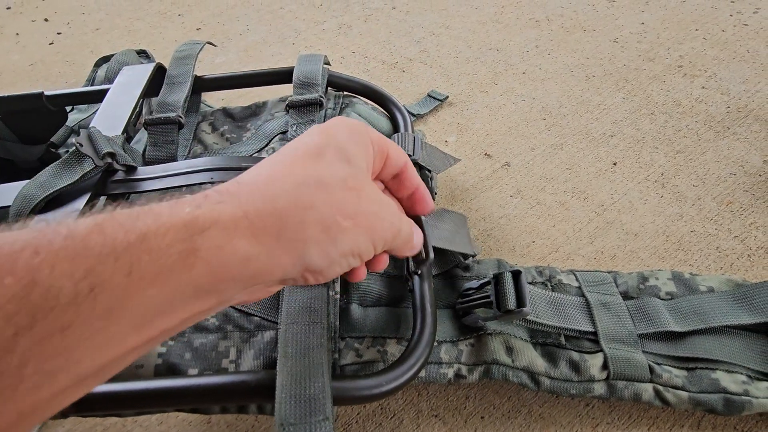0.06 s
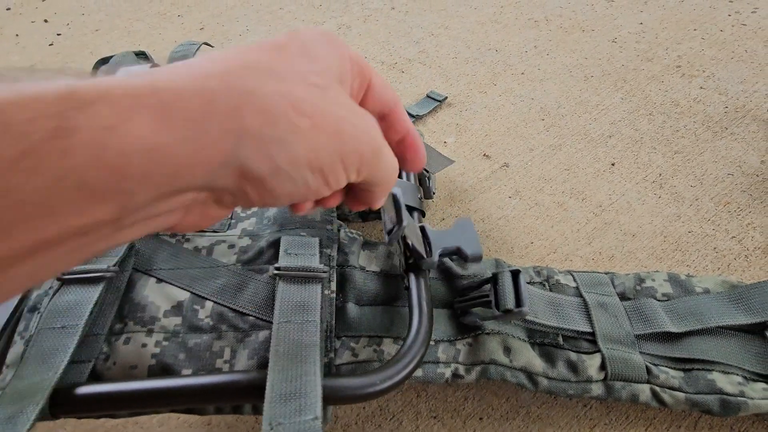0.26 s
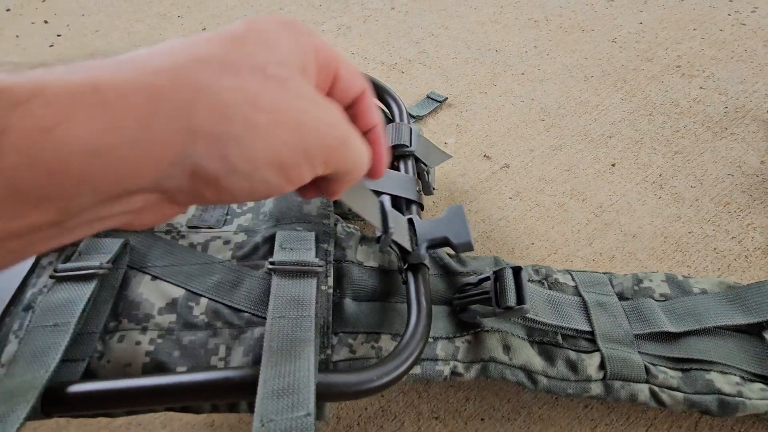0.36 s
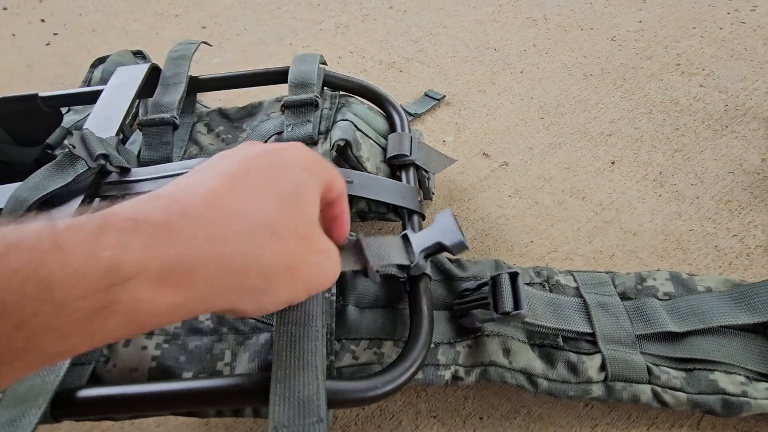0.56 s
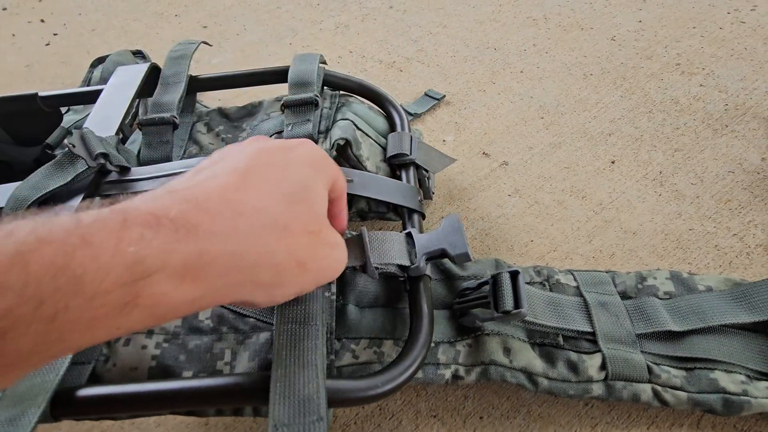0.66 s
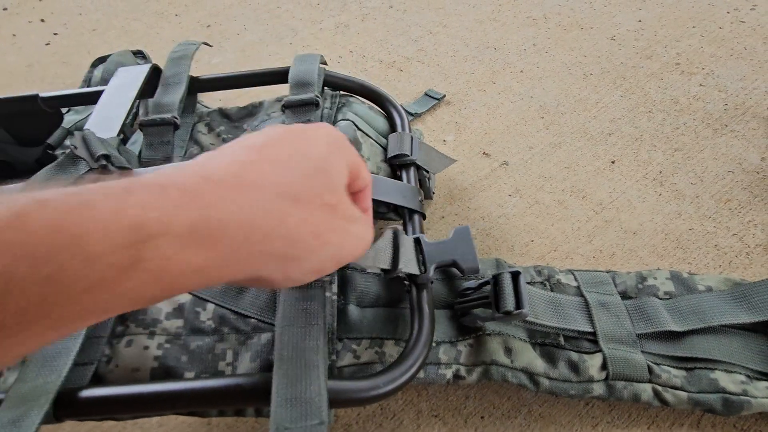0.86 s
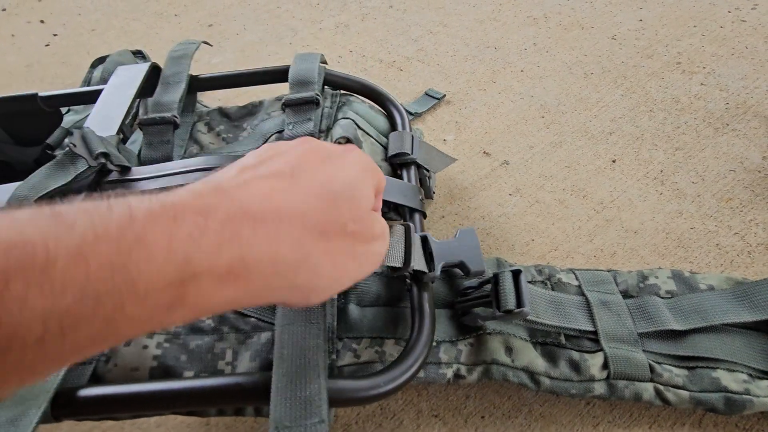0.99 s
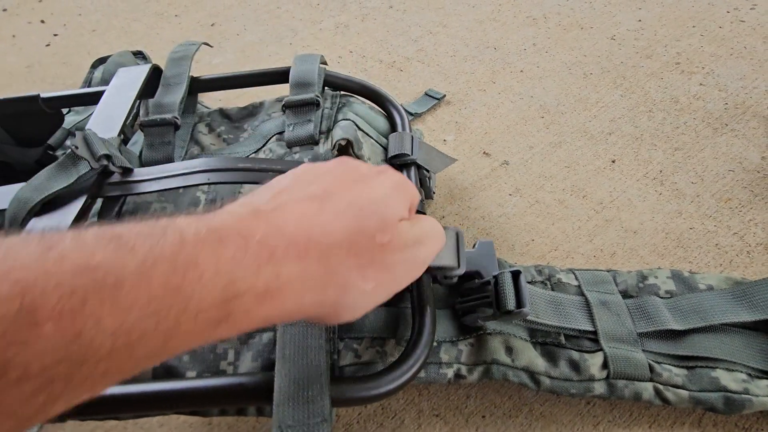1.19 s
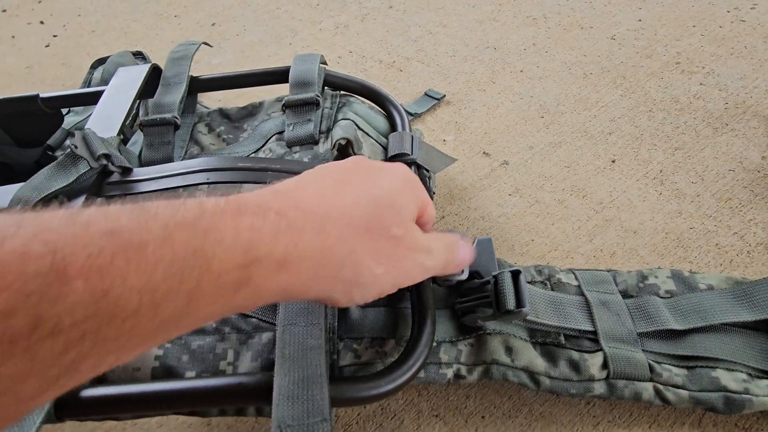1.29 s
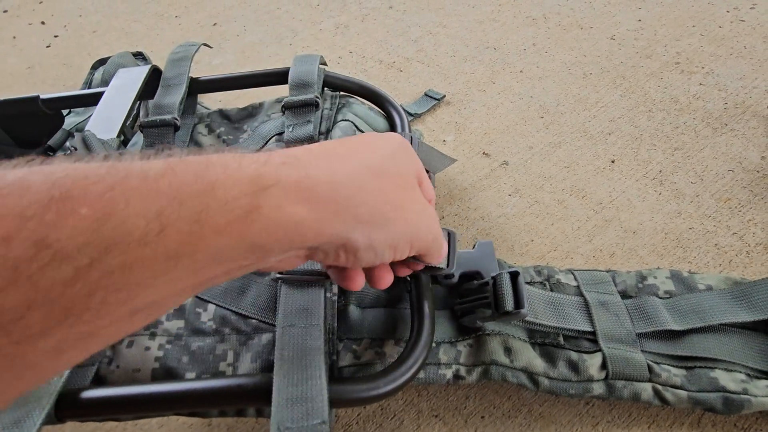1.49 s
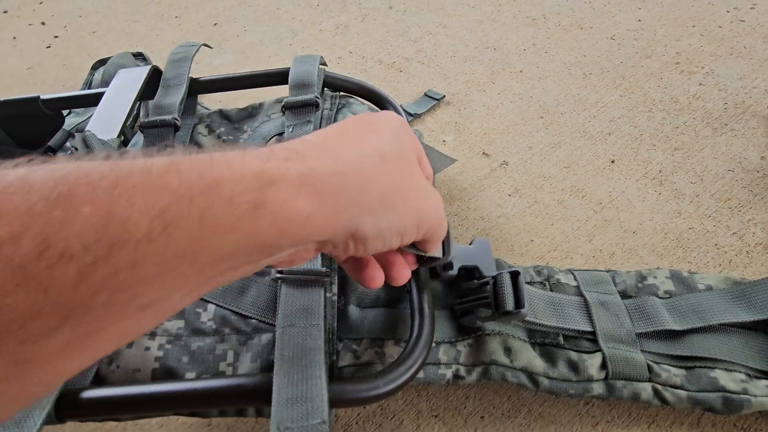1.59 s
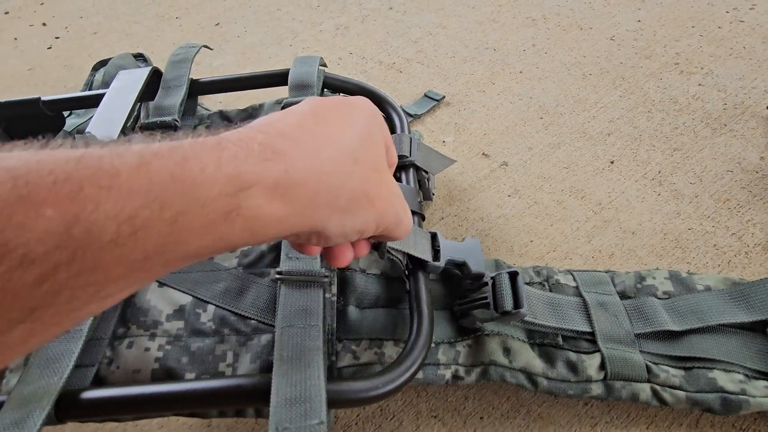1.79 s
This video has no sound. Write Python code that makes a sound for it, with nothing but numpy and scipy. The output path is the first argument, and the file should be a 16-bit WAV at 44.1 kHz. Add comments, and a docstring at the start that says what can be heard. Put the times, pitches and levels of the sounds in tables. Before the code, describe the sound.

A plastic buckle clicks and rattles as a webbing strap slides through it.

```python
"""A quiet room, a stereo microphone close to a rucksack. A hand flips a webbing strap over the metal
tube frame: the plastic buckle rattles and knocks the tube once, and the pack thuds under the hand.
Then the webbing slides through the buckle in short, grainy strokes, among soft bumps on the pack
and scattered clicks. Midway the buckle's loose half ticks against its mate; a cluster of clicks
comes last. Ventilation rumble, a low hum and a faint hiss lie under it all."""
import sys
import numpy as np
from scipy import signal
from scipy.fft import rfft, irfft
from scipy.io import wavfile

SR = 44100
rng = np.random.default_rng(int(sys.argv[2]) if len(sys.argv) > 2 else 0)


def bounce(signal):
    """Save signal as a 16-bit WAV file at the path given by the first command-line argument."""
    frames = np.transpose(np.atleast_2d(signal))
    limited = np.clip(frames, -1, 1)
    pcm = np.round(limited * 32767).astype(np.int16)
    wavfile.write(sys.argv[1], SR, pcm)


N = 81585
SIDE = np.array([[1], [-1]])  # adds to the left channel, subtracts from the right


def buckle():
    """Each contact cracks, knocks the buckle's body and rings the modes its contact point favours."""
    # contacts: start_s, ring_db, crack_db, knock_db, bright_hz, t60_factor, pan_db
    contacts = [(.028, -44.5, -47, -68, 3600, 0.49, 1), (.104, -47.5, -58, -49.5, 3270, 0.39, 0),
                (.2108, -26.5, -27.5, -52, 2950, 1.2, 3), (.2125, -29.5, -27, -36.5, 3050, 0.87, -13),
                (.219, -33.5, -41, -40.5, 2920, 1.6, 10.5), (.229, -33, -39, -49, 2680, 0.87, -3),
                (.250, -41, -40, -59, 5000, 0.76, -9), (.2706, -33, -24, -53, 3000, 0.54, 3),
                (.272, -49, -23.5, -34, 6000, 0.4, 0), (.285, -21.5, -18, -47, 7700, 0.65, -2.5),
                (.2875, -21.5, -18.5, -41, 4000, .9, -5), (.291, -28, -21.5, -56, 7600, 0.28, -9),
                (0.2936, -19, -33, -40.5, 5300, 1, -2), (0.297, -30.5, -22, -40, 3500, 0.85, 2),
                (.353, -29.5, -34.5, -45.5, 3830, 0.59, -1.5), (.355, -34, -35.5, -69, 4230, 0.28, -14),
                (.560, -43.5, -52, -44, 2800, 0.29, 0), (.6885, -50, -62, -77, 5600, 0.56, -8),
                (0.7514, -57, -56, -72, 6000, 0.54, -9), (.795, -50, -70, -64, 2200, 0.84, -11),
                (.806, -41.5, -51, -62, 2500, 0.27, -6.5), (.889, -36, -54, -54, 3900, 0.82, -5.5),
                (1.1046, -42, -41, -64, 6800, .3, -4), (1.11, -49, -45, -72, 7400, 0.23, -15),
                (1.125, -30.5, -31.5, -64, 5560, 0.42, -2.5), (1.127, -36, -54, -32, 2440, 0.6, -5.5),
                (1.735, -45, -61, -49.5, 2220, 1.1, 1.5), (1.805, -63, -39, -59, 7500, 0.47, -4),
                (1.8128, -31.5, -40.5, -66, 3870, 1.2, 6.5), (1.8155, -39.5, -39, -56, 3430, .8, 1),
                (1.819, -36, -45, -45, 3020, 1.2, -5.5), (1.829, -34, -54, -70, 3300, 0.66, 0)]
    # ringing modes of the plastic: pitch_hz, level_db, t60_s
    buckle_modes = [(1204, -5, 0.055), (1690, -15.5, 0.11), (2198, -1, 0.051), (2482, -6, 0.041),
                    (2973, -3.5, 0.077), (3350, -9, 0.066), (3708, -5.5, 0.039), (4260, -14, 0.056),
                    (5010, -6, .045), (5560, -0.5, .05), (6400, -14, 0.072), (7540, -7.5, 0.035),
                    (7880, -4.5, 0.04)]
    # lower modes of the buckle's body: pitch_hz, level_db, t60_s
    knock_modes = [(611, -8.5, 0.049), (740, 0.5, 0.043), (1068, -3, 0.01), (1207, -23, 0.067),
                   (1405, -5, 0.037)]
    # spectrum of the crack: frequency_hz, level_db
    crack_spectrum = [(300, -27), (900, -5), (1800, -3.5), (2600, 6), (5000, -3.5), (8200, 2.5),
                      (9800, -22), (11200, 1.5), (13000, -5.5), (15500, -4.5)]
    grip_detune, scatter_db = 0.0048, 1.5  # fingers shift and reweight the modes on each contact
    port_spread_rad = 0.5  # a turning buckle radiates unevenly towards the two microphone ports
    contact_octaves = 0.5  # width of the favoured band
    out, crack_decay = np.zeros((2, N)), fade(t60=0.015)
    crack_noise = wide_noise(crack_spectrum, side_db=-7.5)
    for start_s, ring_db, crack_db, knock_db, bright_hz, t60_factor, pan_db in contacts:
        scatters, shifts, leads = rng.standard_normal((3, len(buckle_modes)))
        modes = []
        for (hz, db, t60), scatter, shift in zip(buckle_modes, scatters, shifts):
            off_band_db = 10 * np.log10(1 + (2 * np.log2(hz / bright_hz) / contact_octaves) ** 2)
            modes.append((hz * (1 + grip_detune * shift), db + scatter_db * scatter - off_band_db, t60))
        ringing = undb(ring_db) * ring(modes, t60_factor, port_spread_rad * leads)
        knock = undb(knock_db) * ring(knock_modes, t60_factor)
        crack = undb(crack_db) * np.roll(crack_noise, rng.integers(N), axis=1) * crack_decay
        add(out, start_s, pan(pan_db) * (ringing + knock))
        add(out, start_s, pan(pan_db) * crack)
    # the small buckle gives off little bass
    return signal.sosfilt(signal.butter(3, 490, "high", fs=SR, output="sos"), out)


def frame_tube():
    """The buckle strikes the metal tube once, and it rings high and short."""
    # blow on the tube: start_s, level_db
    hits = [(.2705, -14)]
    # tube modes: pitch_hz, level_db, t60_s
    modes = [(2430, -1, 0.089), (2760, 5, 0.008), (3510, -3, 0.02), (5540, -15, 0.035),
             (7470, -10.5, 0.032), (8470, -10.5, 0.023), (10810, -13.5, 0.038), (11800, -22.5, 0.017),
             (13330, -8, 0.015)]
    return strike(hits, modes)


def loose_half():
    """The buckle's loose half ticks against its mate and rings with its own modes."""
    # ticks: start_s, level_db
    ticks = [(.8888, -40.5), (.8935, -43)]
    # modes of the loose half: pitch_hz, level_db, t60_s
    modes = [(1222, -11.5, 0.077), (1724, -12, 0.071), (2566, -2, 0.03), (3110, -2.5, .06),
             (3380, 1, 0.0366), (4120, -5, 0.021), (4667, -24, 0.072), (5360, -3.5, 0.016),
             (6420, -2.5, 0.024)]
    return strike(ticks, modes)


def webbing():
    """Each stroke of the strap swells and dies; threads catching on the buckle make it grainy."""
    # strokes: middle_s, length_s, cloth_db, scrape_db, hiss_db
    strokes = [(0.09, 0.75, -68.5, -66.5, -67.5), (0.214, .04, -64, -74, -59),
               (0.236, 0.053, -50.5, -46, -48), (0.371, 0.11, -61, -56, -52.5),
               (0.52, 0.069, -54.5, -56, -56), (0.619, 0.049, -64.5, -53.5, -56),
               (.683, 0.028, -78, -63, -51.5), (0.756, 0.016, -84, -68, -60),
               (0.801, .035, -64, -60.5, -71), (0.923, 0.084, -77.5, -61.5, -64),
               (1.094, 0.08, -74, -67, -60.5), (1.234, 0.038, -60.5, -79, -68),
               (1.306, .04, -78, -67, -60.5), (1.403, 0.042, -71.5, -66, -64.5),
               (1.468, 0.048, -72.5, -71, -58.5), (1.598, 0.031, -82, -60.5, -49),
               (1.693, 0.072, -70, -69, -60.5), (1.731, 0.026, -77, -77, -60.5),
               (1.80, 0.055, -58, -64, -59), (1.845, 0.06, -67, -57.5, -73)]
    # spectra of cloth rustle, weave scrape and sliding hiss: frequency_hz, level_db
    cloth_spectrum = [(150, -1.5), (400, -6.5), (700, 2.5), (1300, -3.5), (2000, -4.5), (4000, -7.5),
                      (15000, -49)]
    scrape_spectrum = [(400, -25.5), (1500, -3), (2600, -1.5), (4000, 4), (5500, 1), (8000, -1.5),
                       (10000, -14.5), (15000, -21)]
    hiss_spectrum = [(2000, -31.5), (5500, -9), (8000, -6), (9700, -16.5), (11000, -11.5), (12500, -3.5),
                     (15500, -11)]
    catches_per_s, catch_spread_db, grain_share = 780, 2, 0.39
    t, out = clock(), np.zeros((2, N))
    caught = rng.random(N) < catches_per_s / SR
    catches = caught * undb(catch_spread_db * np.minimum(rng.exponential(size=N), 4))
    roughness = unit(signal.fftconvolve(catches, fade(t60=0.00817))[:N])
    grain = unit(1 - grain_share + grain_share * roughness)
    cloth = noise(cloth_spectrum) + .5 * noise(cloth_spectrum, channels=2)
    scrape = noise(scrape_spectrum, channels=2) * pan(db=-2.5)
    hiss = noise(hiss_spectrum, channels=2) * pan(db=-5)
    for middle_s, length_s, cloth_db, scrape_db, hiss_db in strokes:
        swell = np.exp(-(2 * (t - middle_s) / length_s) ** 2)
        out += swell * (undb(cloth_db) * cloth + undb(scrape_db) * scrape + undb(hiss_db) * hiss)
    return out * grain


def pack():
    """The pack gives soft, dead bumps and low thuds under the hand."""
    # bumps and thuds: start_s, level_db
    bumps = [(.5241, -37), (.5905, -42.5), (.6145, -48), (1.2038, -45.5), (1.233, -51)]
    thuds = [(.214, -41), (.281, -49), (.797, -50.5)]
    # their damped modes: pitch_hz, level_db, t60_s
    bump_modes = [(568, 5, .014), (800, -1, 0.025), (1346, -1.5, 0.0084), (3430, -1, .003),
                  (7200, -9, .002)]
    thud_modes = [(166, -8, 0.091), (281, 0, 0.12), (437, -4.5, 0.076)]
    return strike(bumps, bump_modes) + strike(thuds, thud_modes)


def microphone_ports(sound):
    """Close sound reaches the two ports with a phase and level gap that varies with frequency."""
    # left port against right: frequency_hz, lead_rad, level_db
    gaps = [(200, 0, 5.5), (835, 1.3, 3), (1390, 2.3, 8), (2104, 2.34, 2.5), (2500, 0.5, -1.5),
            (3030, 2.16, 4), (5460, 0.5, 1.5), (7750, 1.37, 0), (11900, 2, -3)]
    response = np.exp(1j * SIDE / 2 * along_hz(gaps)) * undb(SIDE / 2 * along_hz(gaps, column=2))
    impulse = np.roll(irfft(response, N), 128, axis=1)[:, :257]  # short and centred on time zero
    return signal.fftconvolve(sound, impulse, mode="same", axes=1)


def room_echoes(sound, t60, delay_s):
    """Dense reflections of even colour, different in each channel."""
    spectrum = rfft(rng.standard_normal((2, N)) * fade(t60))
    whitened = irfft(spectrum / (np.abs(spectrum) + 1e-12), N)
    tail = whitened * fade(t60) ** .2  # a gentle extra fade keeps the late tail quiet
    response = np.zeros((2, N))
    add(response, delay_s, unit(tail) / np.sqrt(N))
    return signal.fftconvolve(sound, response, axes=1)[:, :N]


def room_tone():
    """Low ventilation rumble, a wavering hum of narrow noise bands and a faint hiss."""
    # spectra of rumble and hiss: frequency_hz, level_db
    rumble_spectrum = [(20, -0.5), (45, 4), (70, 1.5), (120, 0.5), (180, -6), (270, -3.5), (340, -17),
                       (450, -23), (900, -23), (2000, -75)]
    hiss_spectrum = [(100, -6), (350, 0.5), (700, -5.5), (2000, -1), (5000, -5.5), (6400, -3), (7500, 9.5),
                     (8700, -9), (10000, -9.5), (12500, -11.5), (15500, -16)]
    # hum bands: pitch_hz, level_db
    hum_bands = [(68, -63.5), (231, -67)]
    rumble = undb(-58) * wide_noise(rumble_spectrum, side_db=-17)
    hum = 0
    for hz, db in hum_bands:
        band = [(hz * .88, -70), (hz * .97, -2), (hz, 0), (hz * 1.03, -2), (hz * 1.12, -70)]
        hum += undb(db) * noise(band)
    hiss = undb(-65.5) * wide_noise(hiss_spectrum, side_db=1)
    return (rumble + hum) * pan(db=1.85) + hiss * pan(db=-4)


def strike(hits, modes):
    """One object struck at the given times."""
    out = np.zeros((2, N))
    for start_s, db in hits:
        add(out, start_s, undb(db) * ring(modes))
    return out


def ring(modes, t60_factor=1, lead_rad=np.zeros(20)):
    """Decaying modes set off by one blow; each may lead in one channel."""
    t, out = np.arange(8000) / SR, 0
    for k, (hz, db, t60) in enumerate(modes):
        tone = np.sin(2 * np.pi * hz * t + np.pi * k / 2 + SIDE * lead_rad[k])
        decay = np.exp(-np.log(1000) * t / max(t60 * t60_factor, 1e-3))
        attack = 1 - np.exp(-np.pi * hz * t)
        out += undb(db) * tone * decay * attack
    return out


def noise(spectrum, channels=1):
    """Noise of rms 1 with the given colour."""
    white = rng.standard_normal((channels, N))
    return unit(irfft(rfft(white) * undb(along_hz(spectrum)), N))


def wide_noise(spectrum, side_db):
    """Stereo noise from independent mid and side signals."""
    return noise(spectrum) + undb(side_db) * SIDE * noise(spectrum)


def along_hz(table, column=1):
    """A table column interpolated on a log-frequency axis."""
    table = np.array(table, float)
    return np.interp(np.log(np.fft.rfftfreq(N, 1 / SR) + 1), np.log(table[:, 0]), table[:, column])


def add(out, start_s, sound):
    """Mix a sound in at a given time."""
    i = int(np.clip(start_s * SR, 0, N - 1))
    n = min(N - i, sound.shape[-1])
    out[:, i:i + n] += sound[..., :n]


def pan(db):
    """Channel gains that put the left db above the right."""
    return undb(SIDE * db / 2)


def fade(t60):
    """Exponential decay, 60 dB down after t60 seconds."""
    return np.exp(-np.log(1000) * clock() / t60)


def clock():
    """Time of every sample in seconds."""
    return np.arange(N) / SR


def undb(db):
    """Decibels to gain."""
    return 10 ** (np.asarray(db) / 20)


def unit(x):
    """Scale to rms 1."""
    return x / np.sqrt(np.mean(x ** 2))


def scene():
    """The rucksack close to the microphone, with short reflections and the room tone behind it."""
    hardware = frame_tube() + buckle() + loose_half()
    near = microphone_ports(hardware) + pack() + webbing()
    return near + undb(-13.5) * room_echoes(near, t60=0.22, delay_s=.007) + room_tone()


def record(dry):
    """The recorder cuts the top steeply."""
    top_hz = 15900
    return signal.sosfilt(signal.ellip(10, .2, 80, top_hz, fs=SR, output="sos"), dry)


dry = scene()
out = record(dry)
bounce(out)
```